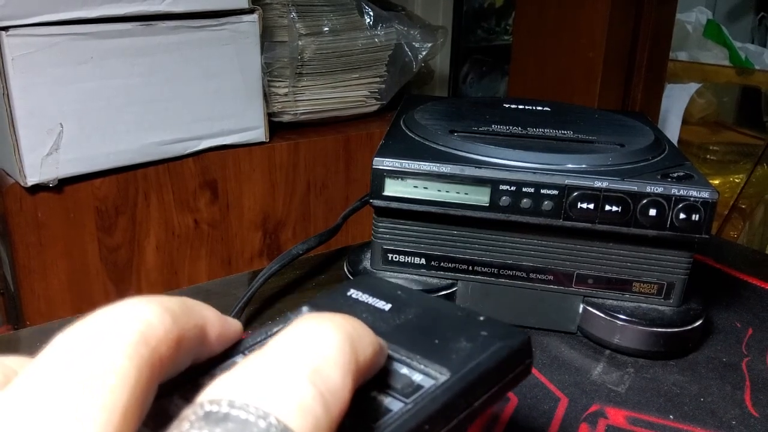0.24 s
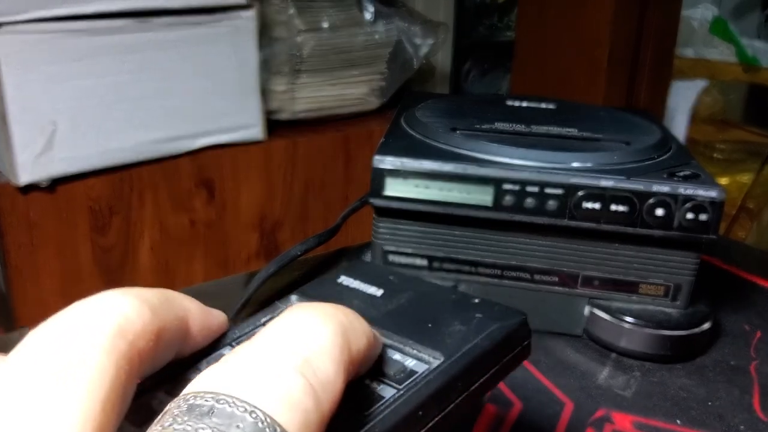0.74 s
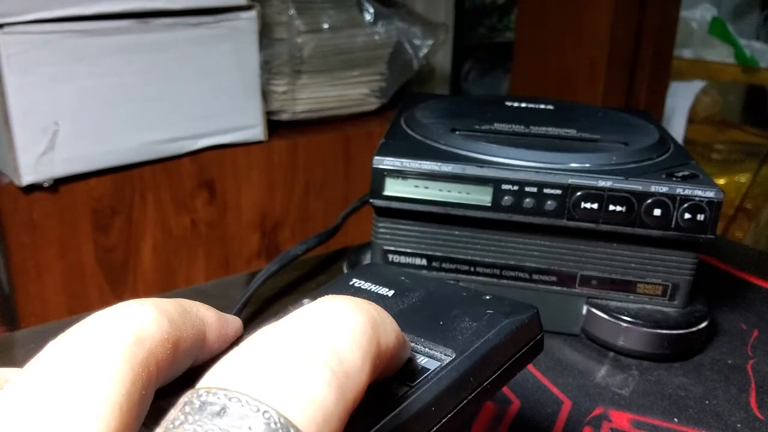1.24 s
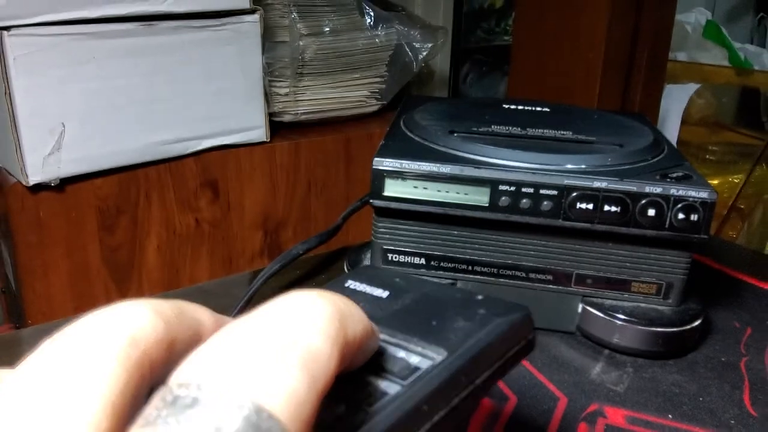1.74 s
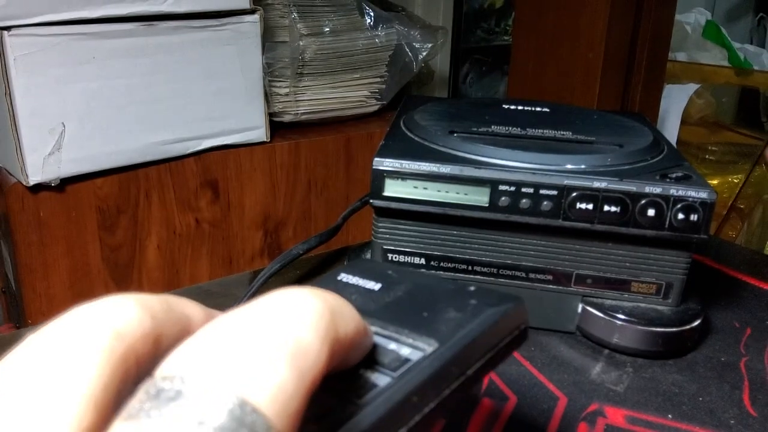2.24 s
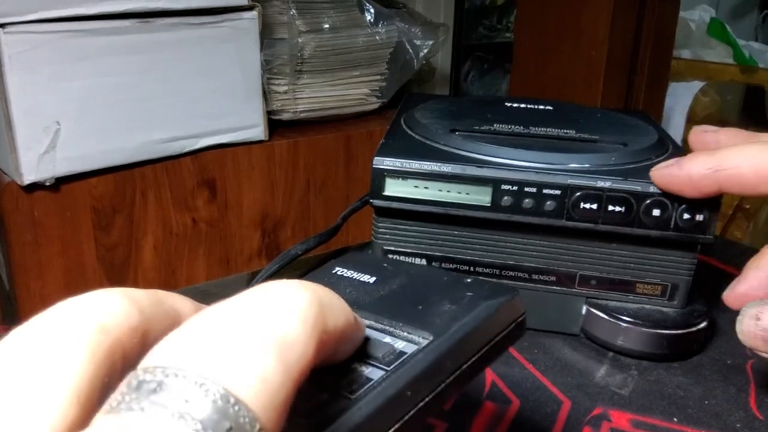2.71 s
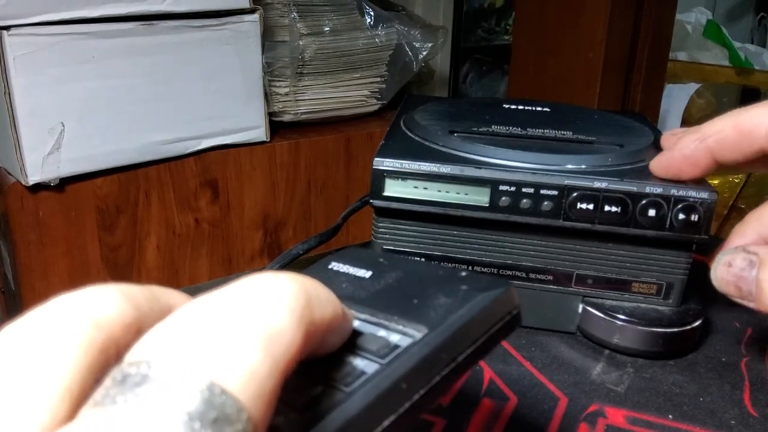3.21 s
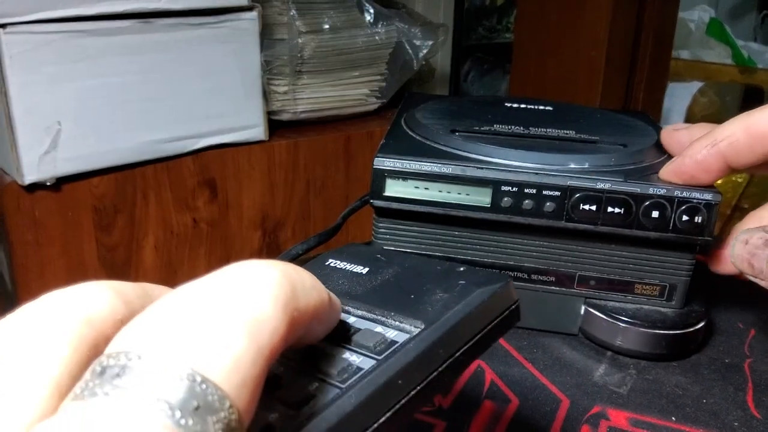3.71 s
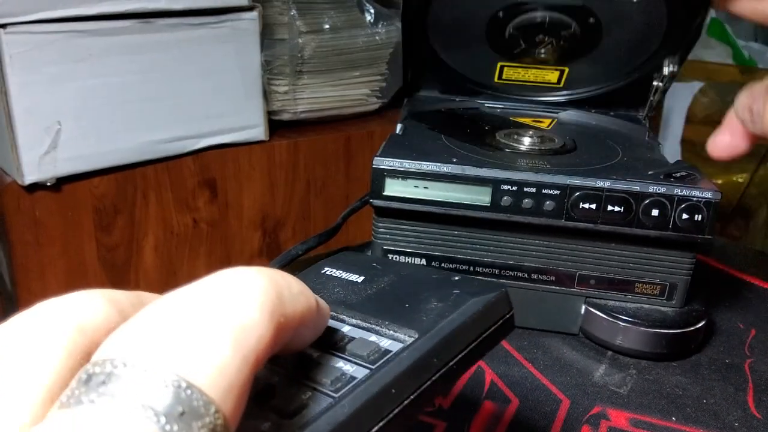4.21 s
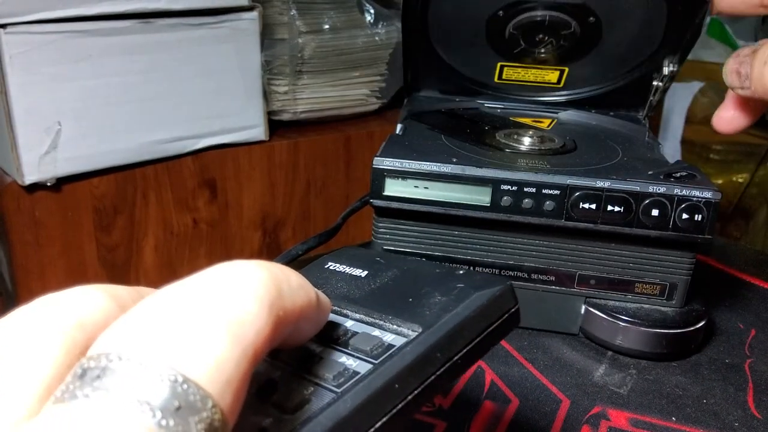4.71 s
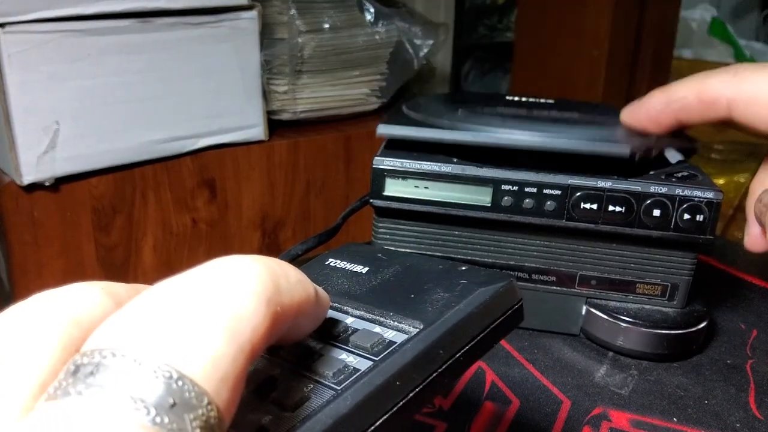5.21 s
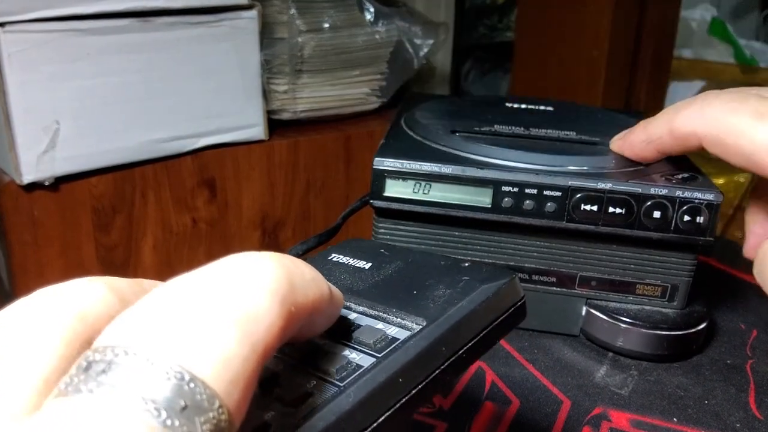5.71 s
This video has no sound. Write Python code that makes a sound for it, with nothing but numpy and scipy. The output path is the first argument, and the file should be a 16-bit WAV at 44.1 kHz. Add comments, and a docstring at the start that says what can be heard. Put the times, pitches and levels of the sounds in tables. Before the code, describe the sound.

A steady mains hum in a quiet room, with a few remote control clicks and a plastic player lid unlatching, then snapping shut.

```python
"""Remote control and disc player lid

A quiet room, heard on a phone's two microphones: a transformer buzzes steadily at overtones of the
mains, over room air and a faint treble hiss. Close by, fingers press a remote control lying on
a desk, so that its shell ticks and the desk top thuds. Then, a little to the right, the lid of a small
plastic disc player is unlatched, swings open and is pushed shut with two clacks."""
import sys
import numpy as np
from scipy import signal
from scipy.fft import rfft, irfft
from scipy.io import wavfile
from scipy.ndimage import uniform_filter1d

SR = 44100
rng = np.random.default_rng(int(sys.argv[2]) if len(sys.argv) > 2 else 0)


def write(x):
    x = np.atleast_2d(x).T
    wavfile.write(sys.argv[1], SR, np.round(np.clip(x, -1, 1) * 32767).astype(np.int16))


N = 262395

# Room air spectrum: pitch_hz, density_db (per Hz)
AIR_SPECTRUM = [(25, -91), (60, -87), (170, -91), (400, -88), (660, -93), (1300, -99), (1800, -101),
                (2400, -97.5), (3400, -99.5), (5400, -103), (6600, -107.5), (11000, -109), (16000, -111)]
# Room resonances that the air keeps ringing: pitch_hz, width_hz, base_level_db
ROOM_MODES = [(41.6, 9.8, -64), (70.6, 6, -67.5), (110.9, 23, -60.5), (261.4, 76, -61), (398, 96, -64.5),
              (784, 145, -65)]
# Swell of the resonances at 200-500 Hz: time_s, gain_db
LOW_MID_SWELL = [(0, -3), (1.5, -2), (1.75, 5), (2.05, -1), (3.2, 0), (3.38, 4), (3.55, 0), (4.5, -1.5),
                 (4.72, 7.5), (4.95, 2.5), (5.7, 1.5), (5.95, 2)]
# Faint treble hiss: pitch_hz, width_hz, base_level_db
HISS_BANDS = [(4400, 500, -73.5), (5300, 400, -74), (7400, 900, -78), (11000, 1100, -77.5)]
# Swell of the hiss, with a brief hand rustle near 2 s: time_s, gain_db
HISS_SWELL = [(0, 1), (1.35, 0), (1.5, -8), (1.85, -6), (1.95, 1), (2.1, 0), (2.2, -7), (3.0, -4),
              (4.3, -3), (5.95, -3)]
# Strongest overtones of the buzz: mains_multiple, rms_db, left_minus_right_db, left_lead_rad
BUZZ_LINES = [(2, -56.0, 1, 0.1), (3, -67.5, 3, 0.4), (4, -60.0, -2, -0.4), (6, -54.5, 0, -0.1),
              (8, -67.0, 5, 0.0), (9, -72.0, 11, 0.0), (10, -66.5, -5, -0.5), (12, -59.5, 6, -0.2),
              (20, -58.0, -11, -1.2), (21, -71.5, -2, -2.3), (22, -67.0, -8, 1.4), (23, -74.5, 5, 2.0),
              (26, -68.0, -9, 2.6), (27, -68.5, -8, -1.8), (39, -71.5, 1, 0.8), (40, -73.0, -5, 0.7),
              (41, -70.0, -5, 0.8), (42, -74.5, -1, 2.5), (47, -70.0, 1, 1.2), (48, -71.0, 4, -2.8),
              (49, -65.0, -3, -0.4), (50, -68.5, -10, -0.4), (54, -73.0, 3, -0.9), (56, -73.5, -2, -1.2),
              (61, -66.0, -15, -0.3), (65, -67.0, -13, -0.5), (67, -71.5, -15, -1.9),
              (71, -71.5, -11, -2.6), (75, -68.5, -8, -2.6)]
# Mean level of each other overtone, even and odd multiples: pitch_hz, level_db
BUZZ_EVEN = [(50, -94), (1300, -78), (1750, -82), (2300, -76), (3000, -77.5), (3800, -88), (4500, -86),
             (6500, -94), (15500, -104)]
BUZZ_ODD = [(50, -84), (1200, -77), (1700, -84), (2200, -78), (4000, -79), (4500, -83), (5400, -85),
            (6500, -92), (15500, -103)]
# Where in the mains cycle each group of overtones peaks: up_to_hz, cycle_share, scatter_rad
BUZZ_PEAKS = [(800, -.09, 0), (1800, 0, 3), (2200, .29, .5), (2650, .59, .4), (3400, .24, .8),
              (16000, 0, 3)]
# Room tail: pitch_hz, width_hz, gain_db, t60_s
TAIL_BANDS = [(704, 700, -37, 0.13), (1600, 620, -32.5, 0.13), (2730, 2200, -34, 0.11),
              (4700, 2700, -38, 0.19), (7500, 3800, -41, 0.22), (11500, 5000, -34, 0.16)]
# Modes of the desk top, the remote's shell and the player: pitch_hz, relative_db, t60_s
DESK_MODES = [(49, -30, 0.1), (58.9, -6, 0.31), (72.8, -2.5, 0.22), (105.4, -3, 0.17), (137.3, 1, 0.104)]
SHELL_MODES = [(295, 14, 0.013), (500, 8, 0.028), (700, 3, 0.015), (1200, 7, 0.012), (1450, 7, 0.009),
               (2600, 7, 0.007)]
PLAYER_MODES = [(270, 0, .03), (400, -3, .025), (470, 0, .035), (560, 1, .025), (690, -2, .018),
                (900, -1, .02), (1100, -1, .016), (1350, -2, .02), (1550, 1, .013), (1750, 1, .011),
                (2400, -4, .016), (2620, -1, .011), (3100, -9, .008), (3550, -3, .009), (4300, -8, .008)]
# Balance at the microphones, for desk and remote and for the player: pitch_hz, left_minus_right_db
DESK_BALANCE = [(300, 1), (550, 6), (1000, -2), (4400, -2), (13000, -3)]
PLAYER_BALANCE = [(300, 1), (550, 3), (900, -8), (1300, -1), (1800, 0), (2600, -9), (3500, -13), (4400, -4),
                  (5500, -8), (7000, -4), (11500, -6), (15000, -3)]
# Taps of the remote, peak levels: start_s, desk_db, shell_hz, shell_db, crack_hz, crack_db
REMOTE_TAPS = [(.2945, -73, 1500, -70, 7500, -54), (.9402, -54, 1320, -31.5, 6000, -44.5),
               (1.7740, -55, 298, -44, 6000, -66), (1.9155, -47, 800, -39, 3700, -42.5),
               (1.9270, -55, 520, -37, 4500, -50), (1.9400, -60, 500, -50, 5000, -50),
               (1.9470, -40.5, 400, -56, 7000, -60)]
# Blows of latch and lid, peak levels: start_s, case_hz, case_db, lid_hz, lid_db, crack_hz, crack_db
LID_BLOWS = [(3.7363, 534, -23, 1450, -37, 3350, -31.5), (3.7761, 463, -18, 3460, -27, 13500, -29),
             (3.784, 790, -33, 1100, -26, 3000, -34), (3.7880, 890, -18, 1730, -19, 6460, -24),
             (3.7958, 706, -30, 2400, -37, 4500, -34), (3.7994, 600, -32, 1940, -27, 6500, -34),
             (3.8034, 603, -27.5, 2900, -31, 6000, -32), (3.808, 605, -38, 2470, -38, 5500, -39),
             (3.821, 500, -37, 2210, -36, 4500, -46), (3.833, 500, -42, 2560, -39, 4000, -45),
             (3.961, 500, -58, 3700, -60, 5200, -41), (3.979, 503, -62, 2500, -46, 5430, -43.5),
             (4.012, 400, -47, 1360, -43.5, 6000, -66), (4.174, 255, -38, 2400, -54, 6000, -54),
             (5.3035, 474, -20, 1750, -19, 4000, -28), (5.3056, 880, -16.5, 2510, -14, 5170, -22),
             (5.3296, 500, -29, 2600, -47, 5000, -50), (5.339, 500, -29, 2500, -34, 5000, -46),
             (5.4542, 674, -14, 1590, -23.5, 6040, -17), (5.4573, 740, -17.5, 3940, -17, 10400, -9),
             (5.9020, 500, -41, 2500, -49.5, 8000, -49.5)]

MAINS_HZ, WHINE_ABOVE_HZ, WHINE_WAVER_DB = 50.018, 2900, 1.6
BUZZ_SCATTER_DB, BUZZ_IN_STEP_HZ, BUZZ_WAVER_S = 3.2, 800, 1e-5
CRACK_T60_S, CRACK_EDGE_HZ, CRACK_EDGE_DB = 0.02, 11900, -8.5
DESK_UNDER_CASE_DB = -12
BOUNCE_OVER_DB, BOUNCE_GAP_S, BOUNCE_GAP_RATIO = -17.2, .0085, 0.94
BOUNCE_CASE_HZ, BOUNCE_LID_HZ, BOUNCE_CRACK_HZ = 440, 2280, 5950
BOUNCE_LOSS_DB, BOUNCE_CRACK_LOSS_DB = -11, -8.5
MIC_LOW_HZ, MIC_TOP_HZ = 36, 15750


def undb(db):
    """Decibels to gain."""
    return 10 ** (np.asarray(db) / 20)


def curve(table, hz):
    """A spectrum read on a log-frequency axis."""
    pitches, values = np.transpose(table)
    return np.interp(np.log(np.maximum(hz, 1)), np.log(pitches), values)


def band(x, hz, width_hz):
    """Resonant band-pass, gain 1 at the centre."""
    return signal.lfilter(*signal.iirpeak(hz, hz / width_hz, SR), x)


def steep_band(x, hz, width_hz):
    """The same band-pass twice, for steeper skirts."""
    return band(band(x, hz, width_hz), hz, width_hz)


def drift(rate_hz):
    """Smooth random wander with standard deviation 1."""
    hold = int(SR / rate_hz)
    steps = np.repeat(rng.standard_normal(N // hold + 1), hold)
    level = uniform_filter1d(uniform_filter1d(steps, hold), hold)[:N]
    return level / level.std()


def unit_peak(pair):
    """Scale the mean power of both microphones to peak at 1."""
    return pair / np.sqrt(np.mean(pair ** 2, axis=0).max())


def add(out, start_s, sound):
    """Mix a sound in at start_s."""
    i = int(start_s * SR)
    out[:, i:i + sound.shape[1]] += sound[:, :N - i]


def room_air():
    """Broad room noise, alike left and right only in the bass, with a few swelling resonances."""
    hz = np.fft.rfftfreq(N, 1 / SR)
    alike = np.clip(1.0 - (hz / 750) ** 2, 0, .8)
    spectrum = rfft(rng.standard_normal((2, N))) * undb(curve(AIR_SPECTRUM, hz)) * np.sqrt(SR / 4)
    mid, side = spectrum * np.sqrt([1 + alike, 1 - alike])
    out, swell = 0, drift(2.38)
    # each octave drifts with the whole and flickers a little on its own
    for octave in range(4, 16):
        share = np.cos(np.pi / 2 * np.clip(np.log2(hz + 1) - octave, -1, 1)) ** 2
        noise = irfft([(mid + side) * share, (mid - side) * share], N)
        out = out + noise * undb(0.5 * swell + 1.1 * drift(3.4))
    low_mid_db = np.interp(np.arange(N) / SR, *np.transpose(LOW_MID_SWELL))
    for pitch_hz, width_hz, db in ROOM_MODES:
        shared, own = rng.standard_normal(N), rng.standard_normal((2, N))
        # below 100 Hz each microphone also feels its own draught
        apart = min(pitch_hz / 1200, 1) if pitch_hz > 100 else .6
        drone = steep_band(np.sqrt(1 - apart ** 2) * shared + apart * own, pitch_hz, width_hz)
        out += drone / drone.std() * undb(db + 0.53 * drift(3.36) + (200 < pitch_hz < 500) * low_mid_db)
    return out


def treble_hiss():
    """Faint treble hiss that comes and goes, with a brief hand rustle near 2 s."""
    out = 0
    for hz, width_hz, db in HISS_BANDS:
        hiss = steep_band(rng.standard_normal((2, N)), hz, width_hz)
        out = out + undb(db) * hiss * np.sqrt(SR / width_hz * 2 / np.pi)
    return out * undb(np.interp(np.arange(N) / SR, *np.transpose(HISS_SWELL)))


def transformer_buzz():
    """One mains cycle built from its overtones and repeated, wavering slightly."""
    size = 2 ** 14
    multiples = np.arange(1, 311)
    hz = multiples * MAINS_HZ
    chance = rng.standard_normal((len(hz), 4)).T
    db = np.where(multiples % 2, curve(BUZZ_ODD, hz), curve(BUZZ_EVEN, hz)) + BUZZ_SCATTER_DB * chance[:2]
    # weak high overtones reach the microphones by way of the walls, out of step
    lead = np.pi * np.minimum(hz / BUZZ_IN_STEP_HZ, 1) ** 2 * chance[2]
    for multiple, rms_db, balance_db, lead_rad in BUZZ_LINES:
        gains = undb([balance_db / 2, -balance_db / 2])
        db[:, int(multiple) - 1] = rms_db + 20 * np.log10(gains / np.sqrt(np.mean(gains ** 2)))
        lead[int(multiple) - 1] = lead_rad
    mics = undb(db) * np.exp(.5j * np.array([lead, -lead]))
    up_to_hz, cycle_share, scatter_rad = np.transpose(BUZZ_PEAKS)
    group = np.searchsorted(up_to_hz, hz)
    phase = scatter_rad[group] * chance[3] - 2 * np.pi * multiples * cycle_share[group]
    phase -= np.angle(mics.sum(axis=0))
    lines = np.zeros((2, size // 2 + 1), complex)
    lines[:, multiples] = mics * np.sqrt(2) * size / 2 * np.exp(1j * phase)
    # the whine at the top of the buzz swells and fades on its own
    high = np.arange(size // 2 + 1) * MAINS_HZ > WHINE_ABOVE_HZ
    cycles = irfft([lines * ~high, lines * high], size)
    place = (np.arange(N) / SR + BUZZ_WAVER_S * drift(8.9)) * MAINS_HZ % 1 * size
    buzz, whine = np.array([[np.interp(place, np.arange(size), cycle, period=size) for cycle in pair]
                            for pair in cycles])
    return undb(0.4 * drift(7.0)) * buzz + undb(WHINE_WAVER_DB * drift(2.86)) * whine


def room_tail(hits):
    """A small furnished room answers briefly: the energy of each band dies away as diffuse noise."""
    t = np.arange(SR // 3) / SR
    onset, out = 1 - np.exp(-t / 0.0036), 0
    for hz, width_hz, gain_db, t60_s in TAIL_BANDS:
        energy = np.mean(band(hits, hz, width_hz) ** 2, axis=0)
        decay = onset * np.exp(-np.log(1000) * t / t60_s)
        lingering = signal.fftconvolve(energy, decay ** 2)[:N]
        noise = steep_band(rng.standard_normal((2, N)), hz, width_hz)
        out = out + undb(gain_db) * np.sqrt(np.maximum(lingering, 0)) * noise / noise.std()
    return out


def ring(modes, balance, near_hz, rise_cycles, octaves=1.0):
    """One blow on a set of modes, peak 1; modes far from near_hz are hardly woken."""
    hz, db, t60_s = np.array(modes, float).T[:, :, None]
    detune, scatter, path = rng.standard_normal((3,) + hz.shape)
    t = np.arange(SR // 4) / SR
    phase = 2 * np.pi * hz * (1 + 0.018 * detune) * t
    db = db + 1.5 * scatter - 6 * (np.log2(hz / near_hz) / octaves) ** 2
    envelope = undb(db) * np.exp(-np.log(1000) * t / t60_s) * (1 - np.exp(-t * hz / rise_cycles))
    # the two microphones hear high modes along different paths
    lead = np.clip(hz / 700, .4, 1.2) * path
    partials = [-envelope * np.sin(phase + side * lead / 2) * undb(side * curve(balance, hz) / 2)
                for side in (1, -1)]
    return unit_peak(np.sum(partials, axis=1))


def plastic_crack(hz, width_ratio, balance):
    """The bright snap of hard plastic: a short burst of treble noise, peak 1."""
    t = np.arange(SR // 4) / SR
    shared, own = rng.standard_normal(len(t)), rng.standard_normal((2, len(t)))
    burst = (shared + 1.73 * own) * np.exp(-np.log(1000) * t / CRACK_T60_S) * (1 - np.exp(-t / 0.00012))
    body = unit_peak(steep_band(burst, hz, width_ratio * hz))
    edge = undb(CRACK_EDGE_DB) * unit_peak(band(burst, CRACK_EDGE_HZ, width_hz=5100))
    balance_db = curve(balance, hz)
    return unit_peak((body + edge) * undb([[balance_db / 2], [-balance_db / 2]]))


def desk_thud():
    """The desk top swings up slowly, its deepest modes last."""
    return -ring(DESK_MODES, DESK_BALANCE, near_hz=55, rise_cycles=0.46, octaves=2.2)


def remote_control():
    """Close to the phone, keys and shell tap on the desk."""
    out = np.zeros((2, N))
    for start_s, desk_db, shell_hz, shell_db, crack_hz, crack_db in REMOTE_TAPS:
        desk = undb(desk_db) * desk_thud()
        shell = undb(shell_db) * ring(SHELL_MODES, DESK_BALANCE, shell_hz, rise_cycles=0.59)
        crack = undb(crack_db) * plastic_crack(crack_hz, 0.8, DESK_BALANCE)
        add(out, start_s, desk + shell + crack)
    return out


def spread(db, soft, hard):
    """A harder blow widens the crack and the lid's ring, and narrows the case's ring."""
    return np.interp(db, (-45, -20), (soft, hard))


def lid_blow(case_hz, case_db, lid_hz, lid_db, crack_hz, crack_db):
    """One blow snaps the plastic and rings the desk, the player's case and its lid."""
    desk = undb(case_db + DESK_UNDER_CASE_DB) * desk_thud()
    crack = plastic_crack(crack_hz, spread(crack_db, 0.8, 1.24), PLAYER_BALANCE)
    case = ring(PLAYER_MODES, PLAYER_BALANCE, case_hz, 0.64, octaves=spread(case_db, 0.91, 0.41))
    lid = ring(PLAYER_MODES, PLAYER_BALANCE, lid_hz, 1.1, octaves=spread(lid_db, .1, .4))
    return desk + undb(crack_db) * crack + undb(case_db) * case + undb(lid_db) * lid


def disc_player():
    """The loose lid opens and shuts; after a hard blow it bounces twice, quicker and weaker each time."""
    out = np.zeros((2, N))
    for start_s, case_hz, case_db, lid_hz, lid_db, crack_hz, crack_db in LID_BLOWS:
        add(out, start_s, lid_blow(case_hz, case_db, lid_hz, lid_db, crack_hz, crack_db))
        if case_db > BOUNCE_OVER_DB:
            for n in (1, 2):
                delay_s = BOUNCE_GAP_S * sum(BOUNCE_GAP_RATIO ** j for j in range(n))
                loss_db = n * BOUNCE_LOSS_DB
                bounce = lid_blow(BOUNCE_CASE_HZ, case_db + loss_db, BOUNCE_LID_HZ, lid_db + loss_db,
                                  BOUNCE_CRACK_HZ, crack_db + n * BOUNCE_CRACK_LOSS_DB)
                add(out, start_s + delay_s, bounce)
    return out


def scene():
    """Close taps and clacks with their room tail, over buzz, air and hiss."""
    hits = disc_player() + remote_control()
    return hits + room_tail(hits) + transformer_buzz() + room_air() + treble_hiss()


def record(dry):
    """The phone cuts the deep bass and the very top."""
    dry = signal.sosfilt(signal.butter(3, MIC_LOW_HZ, "high", fs=SR, output="sos"), dry)
    return signal.sosfilt(signal.ellip(10, .2, 70, MIC_TOP_HZ, fs=SR, output="sos"), dry)


dry = scene()
out = record(dry)
write(out)
```